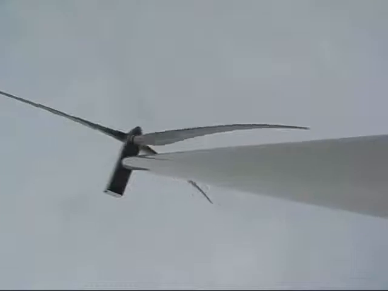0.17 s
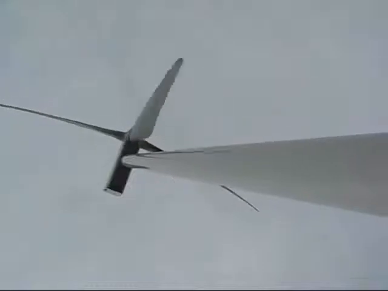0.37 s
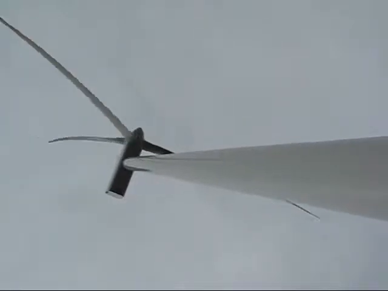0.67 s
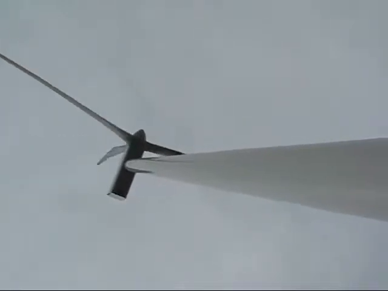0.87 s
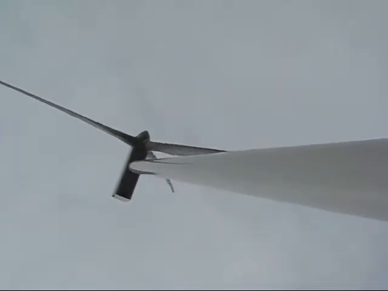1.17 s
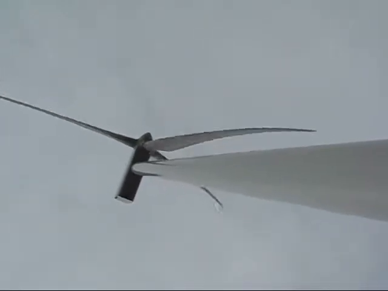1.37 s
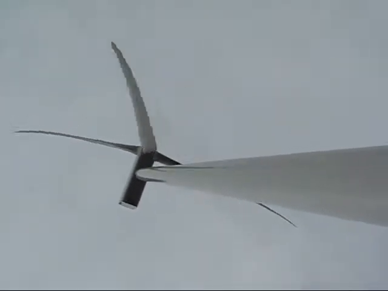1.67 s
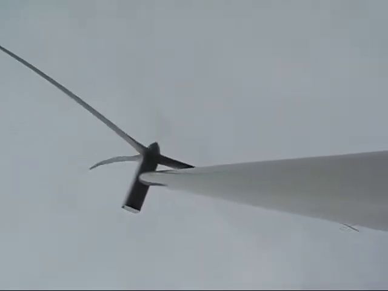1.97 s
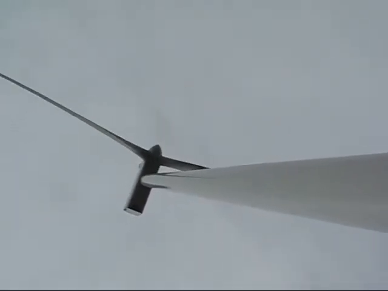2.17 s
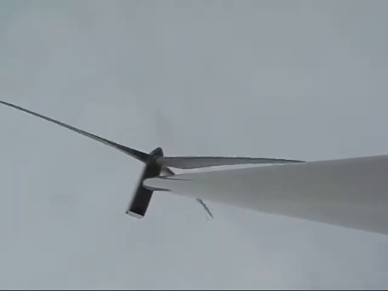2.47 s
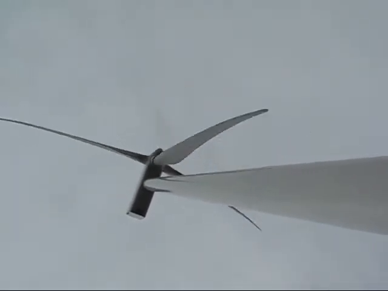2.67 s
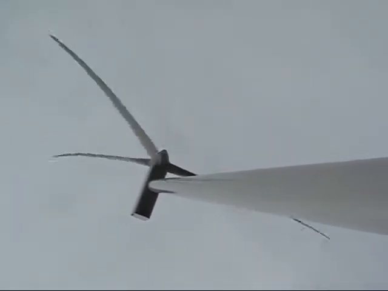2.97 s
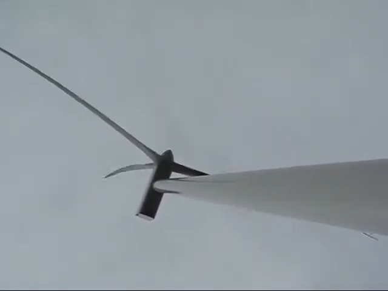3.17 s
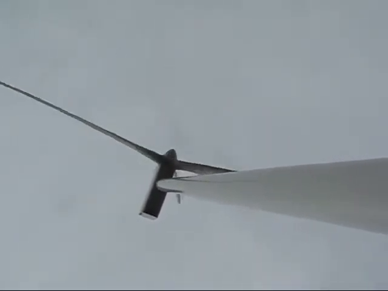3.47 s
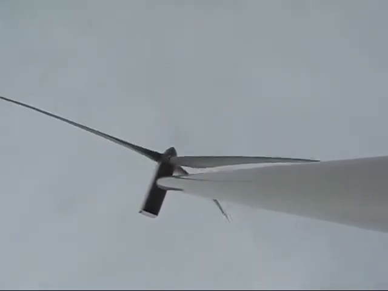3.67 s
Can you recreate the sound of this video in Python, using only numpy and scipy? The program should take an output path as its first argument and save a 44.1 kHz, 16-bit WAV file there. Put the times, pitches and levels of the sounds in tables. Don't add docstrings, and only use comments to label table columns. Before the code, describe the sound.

Gusty wind thuds and crackles against a small unprotected camera microphone on open ground; behind it, large turbine blades sweep overhead with soft airy swishes and a low roar. Sound starts abruptly after a brief silence.

```python
import sys
import numpy as np
from scipy import signal
from scipy.fft import rfft, irfft, next_fast_len
from scipy.io import wavfile

SR = 44100
rng = np.random.default_rng(int(sys.argv[2]) if len(sys.argv) > 2 else 0)


def generate_wav(signal):
    frames = np.transpose(np.atleast_2d(signal))
    scaled = np.clip(frames, -1, 1) * 32767
    pcm = np.round(scaled).astype(np.int16)
    wavfile.write(sys.argv[1], SR, pcm)


def to_linear_factor(level_db):
    exponent = np.asarray(level_db, float) / 20
    return 10 ** exponent


N = 168462

# (time [s], level [dB], brightness of the top [dB])
BLADE_SWEEP = [(.17, -41, -1), (.29, -55.5, 1.5), (.54, -47, 1.5), (.92, -42, -2.5), (1.09, -44, -4.5),
               (1.13, -49.5, 2.5), (1.45, -52.5, -0.5), (1.62, -46, 0.5), (1.69, -50.5, 4.5),
               (2.2, -49.5, 1), (2.27, -44.5, 0), (2.39, -50, 5.5), (2.42, -54, -1), (2.7, -47.5, -3),
               (2.77, -43.5, -3), (2.95, -42, 1), (3.18, -52.5, 4.5), (3.82, -47.5, 0)]


def rms_one(x):
    return x / np.sqrt(np.mean(x ** 2) + 1e-20)


def in_time(rows, column=1):
    return np.interp(np.arange(N) / SR, np.array(rows)[:, 0], np.array(rows)[:, column])


def drift(rate):
    r = np.exp(-40 * np.pi * rate / SR)
    slow = signal.lfilter([1], [1, -2 * r, r * r], rng.standard_normal(N // 20 + 2002))[2000:]
    return np.interp(np.arange(N) / 20, np.arange(len(slow)), rms_one(slow - slow.mean()))


def low_pass(x, hz):
    return signal.sosfiltfilt(signal.butter(2, hz, fs=SR, output="sos"), x)


def ring(clicks, hz, t60):
    r, w = to_linear_factor(-60 / (t60 * SR)), 2 * np.pi * hz / SR
    return signal.lfilter([0, np.sin(w)], [1, -2 * r * np.cos(w), r * r], clicks + 1e-18)


def colour(x, spectrum):
    size = next_fast_len(N)
    hz, points = np.arange(1, size // 2 + 2) * SR / size, np.array(spectrum)
    octaves_below = np.maximum(np.log2(points[0, 0] / hz), 0)
    octaves_above = np.maximum(np.log2(hz / points[-1, 0]), 0)
    want = np.interp(np.log(hz), np.log(points[:, 0]), points[:, 1])
    want = want - 24 * (octaves_below + octaves_above)
    return rms_one(irfft(rfft(x, size) * to_linear_factor(want), size)[:N])


def patchy_noise(patchy_db, rate):
    edges, together, out = 70 * 2 ** np.arange(0, 6.6, .5), drift(rate), 0
    white = rng.standard_normal((2, N))
    for k, (low, high) in enumerate(zip(edges, edges[1:])):
        band = signal.sosfilt(signal.butter(2, [low, high], "band", fs=SR, output="sos"), white[k % 2])
        out = out + band * to_linear_factor(patchy_db * (0.42 * together + drift(rate)))
    return out


def swell_db():
    sweep_db = in_time(BLADE_SWEEP)
    return sweep_db - sweep_db.mean()


def blade_edges():
    # (frequency [Hz], level [dB per Hz])
    edge_colour = [(900, -9), (1300, -3), (1600, -4), (2500, -4.5), (3400, -8.5), (4300, -12), (5400, -20),
                   (6500, -28)]
    hiss = colour(patchy_noise(0.67, 22.4), edge_colour)
    top = signal.sosfiltfilt(signal.butter(2, 3200, "high", fs=SR, output="sos"), hiss)
    tilt = to_linear_factor(in_time(BLADE_SWEEP, column=2)) - 1
    return to_linear_factor(in_time(BLADE_SWEEP) + 5) * (hiss + tilt * top)


def close_pass():
    # (frequency [Hz], level [dB per Hz])
    core_colour = [(1500, -15.5), (2100, -3), (2700, -1.5), (3500, -4.5), (4300, -14.5)]
    level_db, follows = -53.5, 1.5
    return to_linear_factor(level_db + follows * swell_db()) * colour(patchy_noise(1.0, 14), core_colour)


def rotor_roar():
    # (frequency [Hz], level [dB per Hz])
    roar_colour = [(100, 8.5), (250, 1.5), (500, 4.5), (800, 2), (1050, -3), (1300, -19), (2000, -42)]
    level_db, follows = -33.5, 0.84
    return to_linear_factor(level_db + follows * swell_db()) * colour(patchy_noise(1.6, 9.1), roar_colour)


def gust_strength():
    # (start [s], length [s], level [dB], extra level of deep eddies [dB])
    gust_rows = [(0.161, 0.075, -20, -1.5), (0.234, 0.081, -16, -3.5), (0.388, 0.018, -16, 0.5),
                 (.403, 0.02, -18, -1.5), (0.534, 0.062, -19, -4.5), (0.62, 0.061, -19, -1.5),
                 (0.686, 0.1, -20, -2.5), (0.964, 0.05, -27, 10), (1.079, 0.066, -11, -7.5),
                 (1.117, 0.055, -18, 1), (1.241, .15, -17, -2), (1.391, 0.09, -23.5, 1.5),
                 (1.52, 0.046, -29.5, 9.5), (1.636, 0.039, -15.5, -6), (1.688, 0.12, -19.5, 0),
                 (1.853, 0.18, -16.5, -3.5), (2.045, 0.21, -18, 0), (2.271, 0.12, -24.5, 0.5),
                 (2.42, 0.046, -31.5, 6.5), (2.486, 0.2, -21, 0), (2.781, 0.15, -25.5, -0.5),
                 (2.974, 0.097, -16.5, -4), (3.123, 0.085, -13, -4.5), (3.241, 0.15, -24.5, 4),
                 (3.343, 0.16, -18.5, -3.5), (3.597, 0.12, -25, 1)]
    lull_db, rise_s, fall_s = -30.5, 0.0073, 0.012
    t = np.arange(N) / SR
    small = deep = to_linear_factor(2 * lull_db)
    for s, length, db, deep_db in gust_rows:
        shape = np.exp(np.minimum(0, np.minimum((t - s) / rise_s, (s + length - t) / fall_s)))
        small = small + shape * to_linear_factor(2 * db)
        deep = deep + shape * to_linear_factor(2 * (db + deep_db))
    return np.sqrt(small), np.sqrt(deep)


def buffeting():
    # (frequency [Hz], level [dB per Hz])
    buffet_colour = [(12, -58), (20, -9), (48, -1.5), (157, 0), (447, -8), (872, -17), (1190, -25.5),
                     (1500, -27), (1950, -61.5), (3300, -120)]
    eddies_per_s, eddy_cycles, spread_db, lump_db, wind_db = 690, 3.2, 2, 3, -2.5
    crest, ceiling, deep_hz = .03, 1.8, 110.4
    lumps_db = lump_db * drift(19.3)
    sizes = to_linear_factor(spread_db * np.minimum(rng.exponential(1, N), 4)) * rng.choice([-1, 1], N)
    born = rng.random(N) < eddies_per_s / SR
    dealt = rng.integers(0, 12, N)
    eddies = 0
    for k, hz in enumerate(np.geomspace(25, 1400, 12)):
        bursts = ring(sizes * born * (dealt == k), hz, eddy_cycles / hz)
        eddies = eddies + rms_one(bursts) * hz ** .5
    eddies = colour(eddies, buffet_colour)
    eddies = eddies + crest * (eddies ** 2 - 1)
    eddies = rms_one(to_linear_factor(lumps_db) * eddies)
    eddies = low_pass(ceiling * np.tanh(eddies / ceiling), 900)
    eddies = to_linear_factor(wind_db) * rms_one(eddies)
    low = low_pass(eddies, deep_hz)
    small, deep = gust_strength()
    return small * (eddies - low) + deep * low


def button():
    # (time [s], pitch [Hz], level [dB], time to fade by 60 dB [s])
    ticks = [
        (0.199, 3200, -25, 0.004),
        (0.199, 1193, -23.5, 0.038),
    ]
    return sum(ring(to_linear_factor(db) * (np.arange(N) == int(s * SR)), hz, t60) for s, hz, db, t60 in ticks)


def slaps(rows, cycles, gain_db, edge_hz):
    out = np.zeros(N)
    for s, db, hz in rows:
        first = int(s * SR)
        turns = np.arange(min(9000, N - first)) / SR * hz
        out[first:][:len(turns)] += to_linear_factor(db + gain_db - 60 * turns / cycles) * np.sin(2 * np.pi * turns)
    return signal.sosfilt(signal.butter(2, edge_hz, fs=SR, output="sos"), out)


def flicks():
    # (time [s], peak level [dB], pitch [Hz])
    flick_rows = [(0.2104, -24.5, 886), (0.2671, -19, 896), (0.3194, -22.5, 1057), (0.3804, -30.1, 1311),
                  (0.386, -15, 815), (0.407, -40, 640), (0.8603, -23, 1000), (0.916, -23.3, 910),
                  (1.0547, -31, 1098), (1.0723, -21, 1470), (1.0785, -29.3, 1547), (1.0985, -19, 990),
                  (1.1689, -22, 943), (1.2443, -24.5, 864), (1.2721, -21.5, 826), (1.6525, -36.7, 1534),
                  (1.6599, -41, 561), (1.6659, -17, 954), (1.7322, -23, 1484), (1.8757, -21, 825),
                  (1.9344, -22, 940), (1.9728, -23.5, 1001), (2.0078, -15.5, 863), (2.0159, -24, 1024),
                  (2.0551, -24.7, 1580), (2.0668, -19, 990), (2.0868, -17, 940), (2.109, -24, 943),
                  (2.3932, -24.5, 1249), (2.5056, -27.5, 1200), (2.5588, -24.5, 1342), (2.8189, -31, 1214),
                  (2.9463, -27, 1610), (3.0035, -25, 1430), (3.0221, -23.5, 940), (3.1277, -28, 1550),
                  (3.1759, -19.5, 810), (3.1881, -29.5, 1130), (3.2064, -27, 910), (3.3687, -24, 1020),
                  (3.3804, -21, 815), (3.4247, -20, 808), (3.4569, -17, 553), (3.4722, -23, 872),
                  (3.6516, -25, 959), (3.8189, -29, 1596)]
    return slaps(flick_rows, cycles=5.0, gain_db=4.5, edge_hz=2500)


def pushes():
    # (time [s], peak level [dB], crest width [ms])
    push_rows = [(0.2217, -14.5, 1.36), (0.266, -8, 1.7), (0.3846, -7.5, 0.79), (0.5745, -9, 2.2),
                 (0.588, -11, 0.71), (0.5945, -8.5, 1.4), (0.9892, -15.5, 3.2), (1.0766, -12, 0.84),
                 (1.0882, -11, 2), (1.1128, -23, 1.2), (1.1535, -13, 1.6), (1.1688, -15, 0.72),
                 (1.2586, -12.2, 1.5), (1.273, -2, 1.06), (1.3005, -10.4, 1.25), (1.3286, -16.5, 0.83),
                 (1.3483, -13, 1.7), (1.357, -7, 0.97), (1.376, -14, 1.4), (1.5681, -11.5, 1.26),
                 (1.654, -18, 0.55), (1.6676, -7, 1.14), (1.7426, -9, 1.4), (1.773, -14.5, 1.16),
                 (1.8537, -15, 0.88), (1.8761, -13.5, 0.88), (1.9289, -14, 1.5), (1.9356, -8.5, 1.4),
                 (2.0084, -13.5, 2), (2.016, -12.5, 0.83), (2.0703, -12.5, 1.77), (2.1336, -13.5, 1.1),
                 (2.16, -8.5, 0.98), (2.185, -13, 1.4), (2.207, -11.5, 0.72), (2.2887, -4.5, 1.8),
                 (2.3363, -7.5, 1.24), (2.3739, -10, 1.9), (2.387, -7, 1.27), (2.3943, -12.5, 1.26),
                 (2.5263, -7.5, 1.07), (2.6139, -10, 1.2), (2.8331, -12.5, 1.1), (2.8633, -11, 0.83),
                 (3.022, -10, 0.83), (3.046, -11.5, 0.58), (3.0747, -10, 1.1), (3.1385, -8.5, 1.2),
                 (3.1573, -16.5, 1.4), (3.1858, -7.5, 0.76), (3.207, -12, 0.78), (3.3536, -6, 1.3),
                 (3.3605, -13.7, 1.2), (3.3686, -7.5, 0.51), (3.4594, -9, 0.55), (3.4733, -7, 0.66),
                 (3.4808, -10.5, 1.34), (3.667, -12.5, 0.76)]
    rebound, rebound_widths, gain_db = 0.66, 1.5, 0.5
    out = np.zeros(N)
    for s, db, ms in push_rows:
        first = int(s * SR) - 400
        widths = (np.arange(first, min(first + 1400, N)) / SR - s) * 1000 / ms
        late = (widths - .5 - rebound_widths / 2) / rebound_widths
        bell = 2. ** -(2 * widths) ** 2
        dip = rebound * 2. ** -(2 * late) ** 2
        out[first:][:len(widths)] += to_linear_factor(db + gain_db) * (bell - dip)
    return out


def shoves():
    # (time [s], peak level [dB], pitch [Hz])
    shove_rows = [(0.224, -16, 93), (0.383, -19.5, 48.7), (0.55, -22.5, 141), (0.668, -17.5, 96),
                  (0.765, -11.5, 60.7), (0.958, -17.5, 40.6), (1.215, -19.5, 60.8), (1.82, -16.5, 55.2),
                  (2.09, -14, 96), (2.44, -18, 55.9), (3.0, -16.5, 49.7), (3.74, -19, 60.4),
                  (1.546, -22, 63.6), (1.615, -15, 81), (2.056, -19.5, 68), (2.618, -14.5, 94.7),
                  (2.776, -21, 105.6), (2.973, -20, 129), (3.257, -16.5, 114.5), (3.457, -20, 136)]
    return slaps(shove_rows, cycles=7.4, gain_db=-1, edge_hz=200)


def whistles():
    # (time [s], length [s], pitch [Hz], band width [Hz], level [dB])
    puffs = [(0.367, 0.037, 4000, 300, -54.5), (0.576, .12, 2700, 2120, -47.5),
             (0.755, 0.033, 4440, 1500, -47.5), (0.926, 0.022, 1570, 100, -48),
             (0.935, 0.079, 2660, 1010, -46.5), (1.083, 0.028, 3200, 2780, -41.5),
             (1.634, 0.08, 3200, 2400, -43.5), (1.644, 0.098, 4920, 1100, -46.5),
             (1.773, .14, 5160, 600, -56.5), (1.88, 0.14, 4490, 610, -53), (1.912, .05, 2580, 2220, -52.5),
             (1.995, .04, 2780, 2000, -51), (2.13, 0.07, 2470, 1500, -49.5), (2.82, .12, 2840, 2000, -45.5),
             (3.007, 0.03, 3000, 2470, -49), (2.943, .09, 2730, 1200, -40.5),
             (3.071, 0.033, 3540, 1010, -44.5), (3.334, 0.081, 3720, 497, -50.5),
             (3.318, 0.053, 3000, 1210, -50), (3.658, 0.056, 3200, 1200, -48),
             (3.787, 0.044, 2720, 1520, -47)]
    t, out = np.arange(N) / SR, 0
    for s, length, hz, width_hz, db in puffs:
        band = signal.butter(2, [hz - width_hz / 2, hz + width_hz / 2], "band", fs=SR, output="sos")
        breath = rms_one(signal.sosfilt(band, rng.standard_normal(N)))
        out = out + to_linear_factor(db) * np.exp(-(2 * (t - s) / length) ** 4) * breath
    return out


def ducked(x):
    threshold_db, share, back_db_per_s = -12.5, 0.53, 44.5
    creep = back_db_per_s * np.arange(N) / SR
    held = np.maximum.accumulate(20 * np.log10(np.abs(x) + 1e-6) + creep, axis=1) - creep
    excess_db = signal.lfilter([.02], [1, -.98], np.maximum(held - threshold_db, 0))
    return x * to_linear_factor(-share * excess_db)


def scene():
    turbine = blade_edges() + close_pass() + rotor_roar()
    wind = buffeting() + flicks() + pushes() + shoves()
    return (turbine + wind + button() + whistles())[None]


def roll_off(x):
    return signal.sosfilt(signal.butter(12, 15570, fs=SR, output="sos"), x)


def record(dry):
    start_s, settle_s, jolt_db, jolt_fall_db_per_s = .1655, 0.0081, -14, 3100
    top, steps, hold = 0.5, 128, 4
    x = signal.sosfilt(signal.butter(2, 32, "high", fs=SR, output="sos"), dry)
    since = np.arange(N) / SR - start_s
    settled = 1 - np.exp(-np.maximum(since, 0) / settle_s)
    jolt = to_linear_factor(jolt_db - jolt_fall_db_per_s * np.maximum(since, 0))
    x = top * np.tanh(ducked(x) / top) * settled - jolt
    x = np.floor(x * steps) / steps * (since >= 0)
    x = np.repeat(x[:, ::hold], hold, axis=1)[:, :N]
    x = signal.sosfiltfilt(signal.cheby2(16, 40, 15560, fs=SR, output="sos"), x)
    return roll_off(x)


dry = scene()
out = record(dry)
generate_wav(out)
```